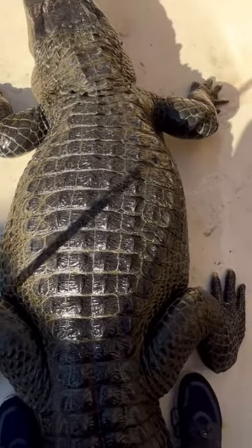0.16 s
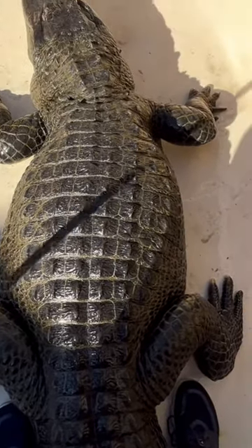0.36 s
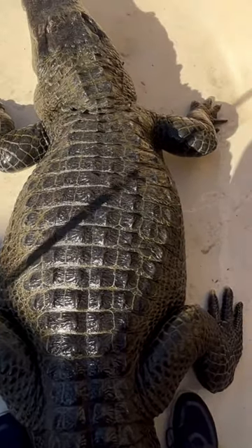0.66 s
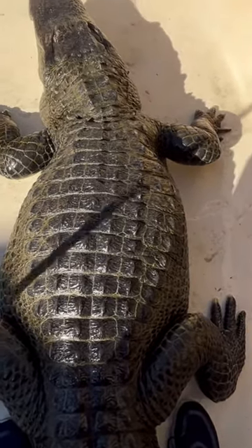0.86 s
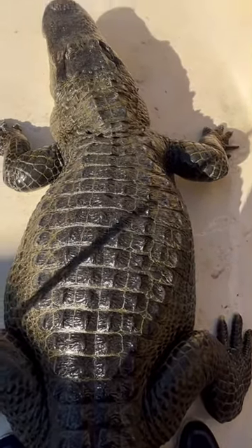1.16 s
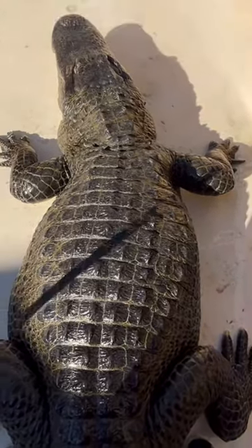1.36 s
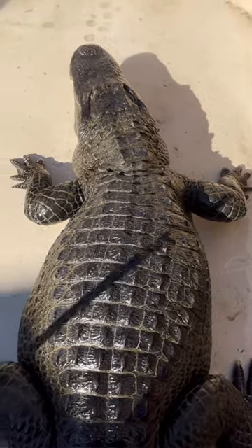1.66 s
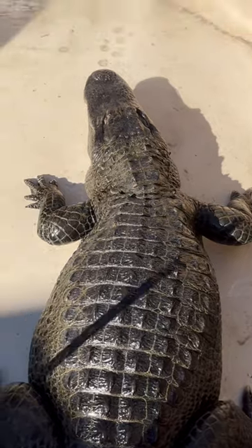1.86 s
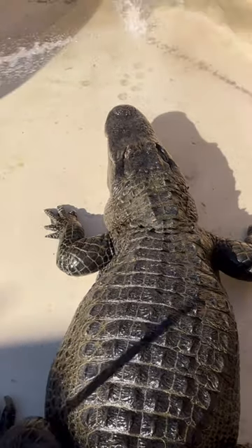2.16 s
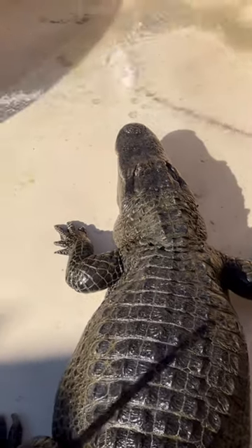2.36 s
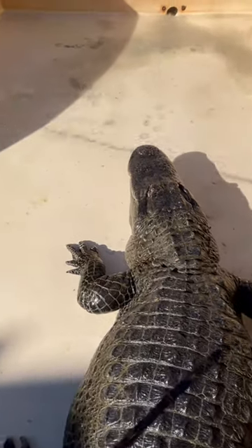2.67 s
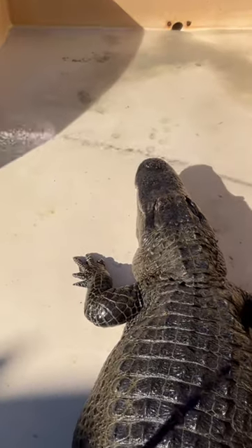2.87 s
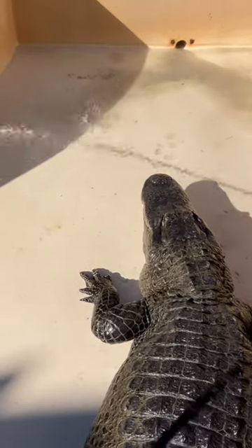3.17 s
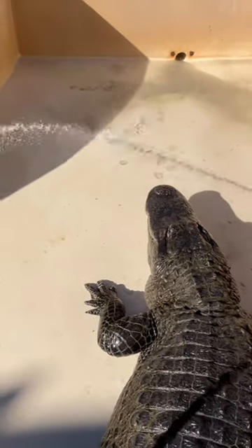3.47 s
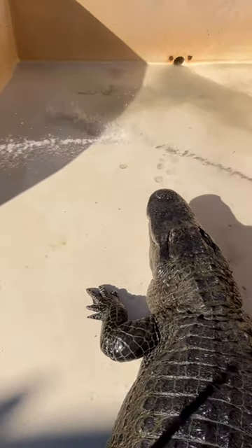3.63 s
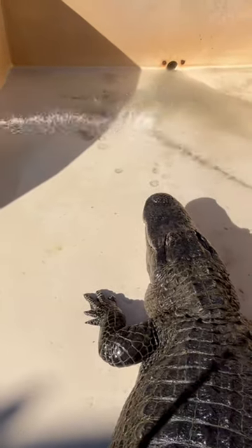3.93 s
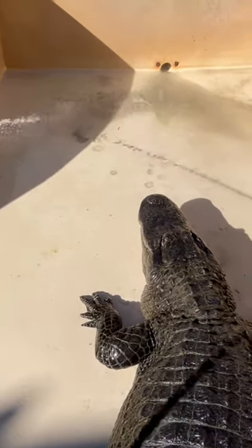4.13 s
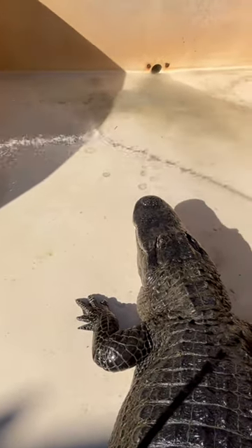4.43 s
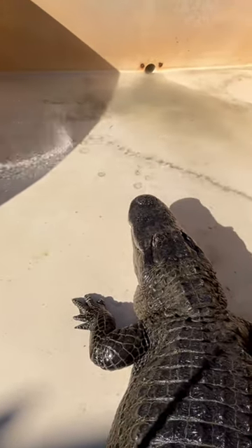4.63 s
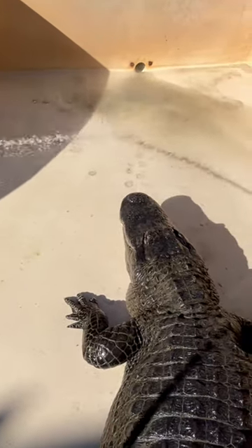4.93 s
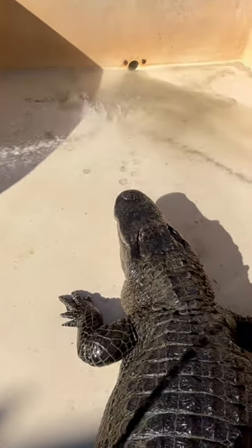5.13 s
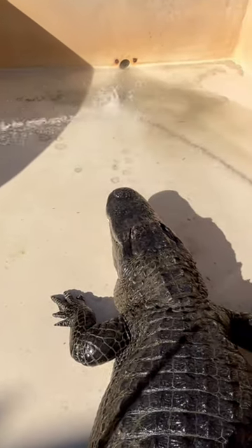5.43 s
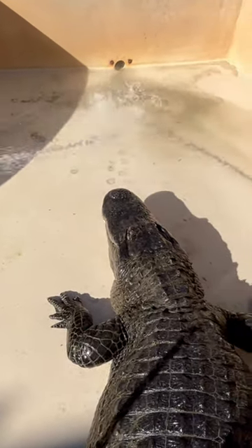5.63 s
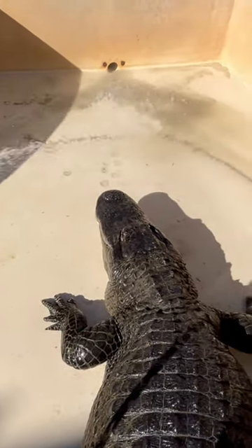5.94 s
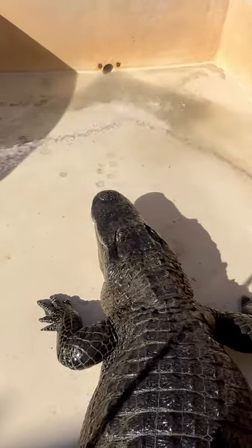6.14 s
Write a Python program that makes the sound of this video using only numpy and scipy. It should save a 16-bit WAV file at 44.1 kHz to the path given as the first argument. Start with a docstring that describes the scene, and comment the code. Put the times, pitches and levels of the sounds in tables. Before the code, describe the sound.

A garden hose sprays water in a hard-walled outdoor pen, heard from close by. It opens with a sharp sizzle, then hisses and splatters in uneven gushes on an alligator's back, with soft, dull drumming. After about two seconds the jet swings onto the wet floor, where the hiss tightens and softens a little. Splashes, gurgles and small bubble plops continue to the end over a faint low rumble.

```python
"""In a hard-walled pen, a garden hose sprays an alligator's back, then swings onto the wet floor.
Countless drop impacts sum to a hiss under a fine mist. The jet breaks into gushes that splash in the
water film and trap air, which resonates as bubbles and gurgles where the water pools. The water's weight
drums softly on the body. Echoes from floor and walls interfere with the spray's sound and shift its
colour, all over a low outdoor rumble."""
import sys
import numpy as np
from scipy import signal
from scipy.fft import rfft, irfft
from scipy.io import wavfile
from scipy.ndimage import map_coordinates

SR = 44100
rng = np.random.default_rng(int(sys.argv[2]) if len(sys.argv) > 2 else 0)


def store_wav(level_fs):
    """Save 16-bit WAV to argv[1]."""
    pcm = np.round(np.clip(np.atleast_2d(level_fs), -1, 1) * 32767)
    wavfile.write(sys.argv[1], SR, pcm.T.astype(np.int16))


N = 277830
TIME, FREQS = np.arange(N) / SR, np.maximum(np.arange(N // 2 + 1) * SR / N, 1)

# Envelopes of the continuous sources, before their gains: time_s, level_db
RUMBLE_LEVEL = [(0, -52.5), (1.2, -51), (2.3, -50.5), (2.7, -54), (3.3, -54.5), (4.2, -54), (5, -52.5),
                (6.3, -52)]
MIST_LEVEL = [(0, -33.5), (.2, -31.5), (.45, -36.5), (1.6, -37.5), (2.2, -36), (2.6, -38), (4.7, -38.5),
              (5.6, -37.5), (6.3, -38.5)]
STEADY_SPLASH_LEVEL = [(0, -37.5), (.45, -41), (.66, -41.5), (.9, -37.5), (1.43, -39), (1.67, -37),
                       (1.96, -39), (2.03, -42), (2.12, -39.5), (2.4, -40.5), (2.6, -43.5), (2.68, -47),
                       (3.3, -46.5), (3.65, -40.5), (4.3, -42), (4.5, -45), (4.75, -46), (4.93, -44.5),
                       (4.97, -39), (5.5, -38.5), (5.9, -43), (6.3, -43)]
JET_LEVEL = [(0, -31), (.27, -33), (.4, -31), (1.0, -31), (1.65, -31.5), (1.85, -30), (2.15, -30.5),
             (2.6, -34), (2.68, -34.5), (2.76, -33), (3.3, -33.5), (3.48, -31.5), (3.57, -31),
             (3.85, -31.5), (3.94, -34.5), (4.05, -34), (4.35, -32.5), (4.78, -34), (5.1, -31.5),
             (5.5, -32), (6.1, -33.5), (6.3, -33.5)]
# Share of the jet that lands on the floor, and how tightly it holds together there: time_s, share
FLOOR_SHARE = [(0, 0.4), (.45, 0.23), (1.55, 0.07), (1.9, 0.83), (2.5, 0.99), (6.3, 0.91)]
JET_FOCUS = [(0, 0), (2.3, 0.12), (2.6, 1), (3.3, 0.74), (3.5, .25), (3.95, 0.6), (4.5, 0.5), (4.7, 0.7),
             (4.9, .9), (5.02, 0.13), (5.6, 0.16), (6.3, .35)]
# Sway of the landing point: time_s, left_minus_right_db
LANDING_SWAY = [(0, 1), (.7, 1.3), (2.2, 1.5), (2.7, 3), (3.7, 2), (5.7, 1.9), (6.3, 1)]
# Hollow resonance of the hiss, gliding as the jet swings: time_s, centre_hz, lift_db
LEFT_RESONANCE = [(0, 6600, 6), (.25, 6750, 4.5), (.5, 6440, 4), (1.2, 5900, 3.5), (1.6, 5600, 3),
                  (2.05, 5050, 4.5), (2.6, 5950, 1.5), (2.9, 6100, 0.5), (4.8, 6000, 2), (5.4, 5380, 4.5),
                  (6.3, 5230, 2.5)]
RIGHT_RESONANCE = [(0, 6750, 2), (.25, 6900, 2.5), (.45, 6960, 3.6), (1.6, 7500, 3.1), (1.9, 6850, 3.9),
                   (2.25, 6860, 4.2), (2.5, 6500, 1.2), (3.7, 6500, 1.3), (5.2, 6300, 1.5),
                   (5.7, 6270, 4.8), (6.3, 5950, 5.9)]
# Bands that reflections cancel or reinforce on the right: time_s, centre_hz, lift_db, bend_rad
UPPER_INTERFERENCE = [(0, 5830, 4, 1.5), (.28, 6130, 6, 1.5), (.45, 6200, -10, 0.94), (.8, 6400, -8, 1.3),
                      (1.2, 6440, 2, 1), (1.55, 6900, -3, 1), (1.85, 6250, -5, 1.7), (2.15, 5650, 5, 0.81),
                      (2.5, 5370, -1, 0.13), (5.4, 5400, -1, 0.26), (5.7, 5800, 2, 0.93),
                      (6.3, 6000, -1, 1.3)]
LOWER_INTERFERENCE = [(0, 3550, 3, 0), (.3, 3520, 2, 0), (.7, 3300, -2.5, 0), (1.2, 3270, 2.5, 0),
                      (1.8, 3340, 0, 0), (3.7, 3330, 0.5, 0), (5.5, 3320, 0.5, 0), (6, 3220, -2, 0)]

# Spectral shapes of the sources: frequency_hz, relative_level_db
RUMBLE_SPECTRUM = [(15, -60), (30, -42), (42, -19), (55, -2.5), (74, 0), (95, -6.5), (118, -2.5),
                   (145, -16), (300, -48)]
PATTER_SPECTRUM = [(30, -45), (80, -23), (150, -3.5), (220, -1), (330, 6), (520, 1.5), (700, -12),
                   (1200, -38)]
THUD_SPECTRUM = [(30, -45), (70, -26), (130, -11), (200, 0), (270, -5), (430, -14), (600, -3.5), (900, -17),
                 (3000, -40)]
GURGLE_SPECTRUM = [(60, -30), (400, -10), (600, -4.5), (760, 2), (1150, 7.5), (1450, 0), (1700, 2),
                   (2050, 3.5), (3000, -44)]
MIST_SPECTRUM = [(7000, -28), (9500, -7), (10400, 1), (11500, 0), (13000, -1.5), (14200, -4), (15600, -2.5)]
SIZZLE_SPECTRUM = [(3000, -35), (6100, -16), (6550, -2), (6750, 3), (7050, -0.5), (7350, -4), (8100, -8),
                   (8700, -29), (9300, -8), (9700, 0), (10200, -9), (10800, -37)]
HIDE_SPLASH_SPECTRUM = [(1100, -28), (1600, -10), (2000, 0.5), (2400, -2), (2900, 2.5), (3700, 5),
                        (5200, -2.5), (8000, -11.5)]
FLOOR_SPLASH_SPECTRUM = [(1100, -29), (1600, -7), (2000, -4.5), (2400, -3.5), (2800, -3), (3300, 1),
                         (4000, 1.5), (5200, -3.5), (8000, -57)]
HIDE_HISS_SPECTRUM = [(1500, -11.5), (3000, -6), (3900, -8.5), (4600, 1.5), (5150, 3.5), (5700, 0),
                      (6300, -1.5), (7200, -1), (8600, -4.5), (9700, -1), (10200, -28), (10800, -35)]
FLOOR_HISS_SPECTRUM = [(1500, -31), (2600, -3.5), (3300, -7), (4600, 2.5), (5200, 4), (5700, 5.5),
                       (6400, 3), (7300, 4.5), (8200, -2), (8900, -0.5), (9700, 1.5), (10200, -4.5),
                       (10800, -35)]
TIGHT_HISS_SPECTRUM = [(1500, -25), (2700, -9), (3300, -8), (4000, -4.5), (4600, 1.5), (5000, 2.5),
                       (5400, 5), (5900, 8), (6400, 9), (7000, 3), (7400, 2), (8200, 0), (8900, 1),
                       (9700, 3), (10200, 1), (10800, -35)]
# Level differences between the ears: frequency_hz, left_minus_right_db
HIDE_BALANCE = [(60, -7), (200, -1.5), (480, -1), (1000, -4.5), (1500, -2.5), (2700, -3), (4500, -4.5),
                (5500, -6), (6200, 3), (7000, 0), (8000, -9.5), (9600, -6), (10400, 0.5)]
FLOOR_BALANCE = [(60, -1.5), (250, -2.5), (480, -8), (1100, 1), (1600, -3.5), (3200, -6), (5300, -3.5),
                 (6400, -5.5), (7100, -7.5), (8600, -1.5), (9600, -9), (10400, -1.5)]
SIZZLE_BALANCE = [(6300, 7), (6900, -4.5), (8000, 1), (8700, 0), (9700, -1), (10400, -2)]
# Extra phase lead of the left ear for spray on the floor: frequency_hz, lead_rad
FLOOR_PHASE = [(500, 0), (1800, -1.1), (2500, -3.6), (3000, -4.7), (3500, -5.7), (4500, -5.9), (5500, -5.9),
               (7000, -6.7), (8200, -6.9), (8700, -9.4), (9300, -12.3), (10200, -12.9)]
# Share of the sound common to both ears, in general and for a tight jet: frequency_hz, share
# The high treble is heard centred, and the very top in antiphase.
COMMON_SHARE = [(60, 0.82), (330, 0.81), (520, 0.07), (750, 0.74), (1500, 0.51), (2100, 0.1), (3100, 0.5),
                (4000, 0.52), (5000, 0.3), (5800, 0.3), (6600, 0.64), (7400, 0.5), (8700, 0.3), (9700, 0.4),
                (10200, 0.3), (10500, 1), (13000, 1), (13700, 0.4), (14500, 1)]
TIGHT_COMMON_SHARE = [(3800, 0.5), (4500, 1), (5000, 0.3), (5500, 0.8), (6500, 0.84), (7500, .72),
                      (8700, 0.34), (9700, 0.3), (10500, 1)]

# Puffs of fine spray: peak_s, length_s, level_db
MIST_PUFFS = [(.283, 0.028, -37.5), (.62, 0.077, -42), (.76, .05, -47), (.91, 0.03, -40), (1.1, .04, -47),
              (1.32, 0.035, -37), (2.4, 0.039, -45), (2.735, 0.04, -38), (3.45, 0.044, -44),
              (3.61, 0.066, -45), (4.385, .035, -46), (5.58, 0.044, -43), (6.15, 0.046, -44)]
# Single ringing blips, mostly bubbles in the puddle, and the knock of the water slap at about 5.37 s: start_s,
# pitch_hz, level_db
SINGLE_RINGS = [(2.078, 934, -40), (2.81, 343, -42), (2.87, 308, -44), (2.91, 572, -48), (3.0, 333, -38),
                (3.38, 590, -45), (4.32, 514, -41), (4.355, 590, -47), (5.022, 2000, -35),
                (5.102, 1890, -32), (5.353, 1790, -30), (5.37, 786, -36), (5.371, 1090, -30),
                (5.387, 1850, -31)]
# Heavy slaps of water: start_s, level_db
WATER_SLAPS = [(.74, -42), (1.53, -39), (2.08, -37), (3.541, -41), (3.83, -40), (5.365, -36), (5.388, -42),
               (5.601, -36.5)]
# Resonances of the air that the slaps trap: pitch_hz, width_hz, level_db
AIR_POCKETS = [(755, 200, 0), (1116, 490, 5.5), (1650, 480, 3.5)]
# Gushes, ringing lower on the back than on the floor: peak_s, length_s, level_db, pitch_hz
JET_GUSHES = [(0.01, .03, -35, 2900), (0.13, 0.041, -39.5, 2900), (0.293, 0.042, -33.5, 2450),
              (0.34, 0.034, -45, 2750), (0.556, 0.044, -33.5, 2500), (0.733, 0.031, -33.5, 2380),
              (0.777, .035, -35.5, 2250), (0.904, 0.042, -37, 2600), (0.973, 0.05, -35, 2280),
              (1.013, 0.021, -42, 2410), (1.116, 0.024, -35, 2470), (1.33, 0.042, -34, 2280),
              (1.525, .03, -34.5, 2400), (1.57, 0.039, -34.5, 2440), (1.677, 0.055, -44, 2400),
              (1.759, 0.027, -35.5, 2430), (1.822, 0.089, -39, 2600), (1.915, 0.076, -37, 2720),
              (2.111, 0.059, -33.5, 3100), (2.235, .04, -40, 3030), (2.322, 0.053, -35.5, 2960),
              (2.544, 0.15, -38.5, 3120), (2.73, 0.038, -38.5, 3720), (2.854, 0.061, -41, 3700),
              (2.975, 0.071, -41, 3700), (3.098, 0.055, -41.5, 3500), (3.369, 0.041, -39.5, 3420),
              (3.456, 0.038, -41, 3370), (3.545, 0.046, -35, 3000), (3.74, 0.02, -42, 3340),
              (3.832, 0.066, -37.5, 2590), (4.101, .1, -37.5, 3120), (4.315, 0.061, -45, 3440),
              (4.605, 0.075, -40.5, 3660), (4.96, .025, -38.5, 3300), (5.033, 0.03, -42, 2170),
              (5.107, 0.039, -41, 2120), (5.223, 0.014, -38.5, 2800), (5.388, 0.05, -38.5, 2870),
              (5.463, .03, -45, 3300), (5.546, .025, -40.5, 2570), (5.616, 0.045, -39, 3000),
              (5.726, 0.04, -37.5, 2960), (5.999, 0.037, -41, 3220)]

LEFT_LEAD_S, LEAD_LOW_HZ, LEAD_HIGH_HZ = 0.000431, 450, 10200   # the left ear leads within this band
ANTIPHASE_ABOVE_HZ = 13900
WALL_DELAY_S, WALL_WOBBLE_S, WALL_ECHO_DB = .00094, .000014, -16
DRUM_DB, DRUM_START_DB, DRUM_SETTLE_S = -49, 4.5, 1   # the drumming starts louder and settles
GURGLE_DB, SIZZLE_DB, SIZZLE_FADE_S = -43, -29.5, 0.38
DRUM_FOLLOWS, GURGLE_FOLLOWS, RING_FOLLOWS = 0.12, 0.65, 0.11   # dB for each dB of surge in the splashing
MIST_GAIN_DB, PUFF_GAIN_DB = 4, 9
SPLAT_GAIN_DB, SPLAT_SPREAD_DB = 4.5, 4
GUSH_GAIN_DB, STEADY_SPLASH_GAIN_DB, GUSH_RAGGED_DB = 4, 5.5, 1.6
HIDE_RING_DB, FLOOR_RING_DB, RING_WANDER_HZ, RING_FLICKER_DB = 3, 4, 90, 0.5   # resonance of the splashes
TIGHT_RING_HZ, TIGHT_RING_DB, TIGHT_WANDER_HZ, TIGHT_FLICKER_DB = 4800, 1.5, 160, 1.8
JET_GAIN_DB, GUSH_HISS_GAIN_DB = 2, -4.5


def from_db(db):
    """Amplitude grows tenfold for every 20 decibels."""
    return 10 ** (np.asarray(db) / 20)


def unit_power(x):
    """Division by the root mean square gives unit power."""
    return x / np.sqrt(np.mean(x ** 2) + 1e-20)


def in_time(rows):
    """Linear interpolation gives each column of a table at every sample."""
    time_s, *columns = np.transpose(rows)
    return [np.interp(TIME, time_s, column) for column in columns]


def at_hz(points):
    """Interpolation on a logarithmic axis gives a table's value at every frequency."""
    hz, value = np.transpose(points)
    return np.interp(np.log(FREQS), np.log(np.maximum(hz, 1)), value)


def drift(rate_hz):
    """Low-pass filtered noise fluctuates smoothly, with unit power."""
    return unit_power(irfft(rfft(rng.standard_normal(N)) / (1 + (FREQS / rate_hz) ** 2), N))


def drops(per_s, spread_db):
    """Shot noise: independent impacts at random moments, many small and a few large."""
    sizes = from_db(spread_db * np.minimum(rng.exponential(1, N), 6))
    return unit_power(sizes * rng.choice([-1, 1], N) * (rng.random(N) < per_s / SR))


def bubble(hz, cycles, rise):
    """A bubble is a damped oscillator whose pitch rises as it nears the surface."""
    t = np.arange(SR // 16) / SR
    age = t * hz / cycles
    return np.exp(-age) * np.sin(2 * np.pi * hz * t * (1 + rise * age))


def swells(rows, rise_share):
    """Incoherent sources add in power: each lump of water swells and ebbs in a bell curve."""
    power = np.zeros(N)
    for peak_s, length_s, db, *_ in rows:
        width_s = length_s * np.where(TIME < peak_s, rise_share, 1 - rise_share)
        power += from_db(db) ** 2 * .5 ** np.minimum(((TIME - peak_s) / width_s) ** 2, 60)
    return np.sqrt(power)


def aimed(hide, floor):
    """An equal-power crossfade shares the water between hide and floor as the jet swings."""
    on_floor = np.clip(in_time(FLOOR_SHARE)[0], 0, 1)
    return np.sqrt(1 - on_floor) * hide + np.sqrt(on_floor) * floor


def resonance(x, controls, width_hz):
    """A gliding resonance or notch scales one band; controls are centre, lift and optional phase bend."""
    hz, frame_s, frames = signal.stft(x, SR, nperseg=512)
    centre_hz, lift_db, *bend_rad = [np.interp(frame_s, TIME, control) for control in controls]
    detuning = (hz[:, None] - centre_hz) / width_hz
    gain = from_db(lift_db * np.exp(-detuning ** 2))
    if bend_rad:
        gain = gain * np.exp(-2j * bend_rad[0] * detuning / (1 + np.abs(detuning) ** 1.6))
    return signal.istft(frames * gain, SR)[1][..., :N]


def in_pen(impacts, spectrum, balance, extra_phase=((20, 0), (20000, 0)), common_share=COMMON_SHARE):
    """Partial coherence: impacts common to both ears mix with a diffuse wash that differs in each."""
    share = np.clip(at_hz(common_share), 0, 1)
    lead_s = LEFT_LEAD_S * (FREQS > LEAD_LOW_HZ) * (FREQS < LEAD_HIGH_HZ)
    phase = 2 * np.pi * FREQS * lead_s + at_hz(extra_phase) + np.pi * (FREQS > ANTIPHASE_ABOVE_HZ)
    ears = np.array([[.5], [-.5]])   # each ear takes half of a difference
    common = np.exp(1j * phase * ears) * rfft(impacts)
    diffuse = rfft(rng.standard_normal((2, N)))
    field = np.sqrt(share) * common + np.sqrt(1 - share) * diffuse
    return unit_power(irfft(field * from_db(at_hz(spectrum) + at_hz(balance) * ears), N))


def wall_echo(x):
    """Comb filtering: the left wall's echo makes peaks that shift as the landing point wobbles."""
    delay_s = WALL_DELAY_S + WALL_WOBBLE_S * drift(rate_hz=4.4)
    left, right = x
    echo = map_coordinates(left, [np.arange(N) - SR * delay_s], order=3)
    return unit_power(np.array([left + from_db(WALL_ECHO_DB) * echo, right]))


def near_echoes(x, echo_db, wander_s, count):
    """Early reflections from floor and walls interfere; their paths wander, so the colour shifts."""
    out = x.copy()
    for k, delay_s in enumerate(np.geomspace(.0013, .009, count)):
        read_at = np.arange(N) - SR * (delay_s + wander_s * drift(rate_hz=1.43))
        echo = np.array([map_coordinates(channel, [read_at], order=3) for channel in x])
        out += (-1) ** k * from_db(echo_db) * echo
    return out / np.sqrt(1 + count * from_db(echo_db) ** 2)


def rumble():
    """The outdoor background is random noise with its power at low frequencies."""
    noise = in_pen(rng.standard_normal(N), RUMBLE_SPECTRUM, FLOOR_BALANCE)
    return from_db(in_time(RUMBLE_LEVEL)[0]) * noise


def drumming(surge_db):
    """Impact forces patter dully on body and floor, with a deeper thud on the body."""
    patter = in_pen(drops(per_s=1800, spread_db=3.5), PATTER_SPECTRUM, FLOOR_BALANCE)
    thud = in_pen(drops(per_s=1100, spread_db=2.5), THUD_SPECTRUM, HIDE_BALANCE)
    opening_db = DRUM_START_DB * np.exp(-(TIME / DRUM_SETTLE_S) ** 2)
    level_db = DRUM_DB + DRUM_FOLLOWS * surge_db + opening_db + .6 * drift(rate_hz=11)
    return from_db(level_db) * aimed(from_db(-5.5) * patter + from_db(-8.0) * thud, patter)


def bubble_cloud(per_s, cycles, rise):
    """Size sets a bubble's resonance: mixed sizes, born at random, ring at mixed pitches."""
    out = np.zeros(N + SR)
    for when, smallness, weakness in rng.random((int(per_s * N / SR), 3)):
        ring, at = bubble(600 * 3 ** smallness, cycles, rise), int(when * N)
        out[at:at + len(ring)] += from_db(-14 * weakness) * ring
    return unit_power(out[:N])


def gurgle(surge_db):
    """Air stirred into the puddle by the splashing resonates and bursts."""
    ringing = bubble_cloud(per_s=640, cycles=9.3, rise=0.0264)
    bursts = drops(per_s=1500, spread_db=6.5)
    level_db = GURGLE_DB + GURGLE_FOLLOWS * surge_db + drift(rate_hz=24)
    return from_db(level_db) * in_pen(0.23 * ringing + 0.16 * bursts, GURGLE_SPECTRUM, FLOOR_BALANCE)


def plops(cycles):
    """Damped oscillators ring one at a time: bubbles in the puddle, the large ones at low pitch, and the knock
    of a landing slap."""
    out = np.zeros(N + SR)
    for start_s, hz, db in SINGLE_RINGS:
        ring, at = bubble(hz, cycles, rise=0.033), int(start_s * SR)
        out[at:at + len(ring)] += from_db(db) * ring * signal.windows.tukey(len(ring), .2)
    return out[:N]


def slaps(decay_s):
    """A landing lump of water briefly excites the resonances of trapped air."""
    envelope = sum(from_db(db) * (TIME > start_s) * np.exp(-np.abs(TIME - start_s) / decay_s)
                   for start_s, db in WATER_SLAPS)
    response = sum(from_db(db) / (1 + 1j * (FREQS ** 2 - hz ** 2) / (FREQS * width_hz)) ** 2
                   for hz, width_hz, db in AIR_POCKETS)
    response /= np.sqrt(np.mean(np.abs(response) ** 2))
    return irfft(rfft(envelope * rng.standard_normal((2, N))) * response, N)


def splats(cycles, spread_octaves, pan_db, count):
    """Air entrainment: each gush traps small bubbles around its own pitch, which make it sound wet."""
    out = np.zeros((2, N + SR))
    clusters = rng.uniform(-1, 1, (len(JET_GUSHES), count, 4))
    for (peak_s, length_s, db, hz), cluster in zip(JET_GUSHES, clusters):
        for when, detuning, strength, place in cluster:
            gain = from_db(db + SPLAT_GAIN_DB + SPLAT_SPREAD_DB * strength)
            ring = gain * bubble(hz * 2 ** (spread_octaves * detuning), cycles, rise=0.027)
            left_at = int(max(peak_s + when * length_s / 2, 0) * SR)
            right_at = left_at + int(LEFT_LEAD_S * SR)
            out[0, left_at:left_at + len(ring)] += from_db(pan_db + SPLAT_SPREAD_DB * place) * ring
            out[1, right_at:right_at + len(ring)] += ring
    return out[:, :N]


def mist(sputter):
    """The finest droplets make shot noise in the top treble, steadily and in puffs."""
    droplets = in_pen(drops(per_s=15000, spread_db=3.0), MIST_SPECTRUM, FLOOR_BALANCE)
    steady = from_db(in_time(MIST_LEVEL)[0] + MIST_GAIN_DB)
    puffs = from_db(PUFF_GAIN_DB) * swells(MIST_PUFFS, rise_share=0.56)
    return np.hypot(steady, puffs) * from_db(0.9 * sputter) * droplets


def sizzle(sputter):
    """Narrow spectral peaks give the opening spray a sharp ring, which holds and then dies away."""
    impacts = drops(per_s=14000, spread_db=3.5)
    ring = in_pen(impacts, SIZZLE_SPECTRUM, SIZZLE_BALANCE, FLOOR_PHASE, TIGHT_COMMON_SHARE)
    return from_db(SIZZLE_DB + 0.87 * sputter) * np.exp(-(TIME / SIZZLE_FADE_S) ** 6) * ring


def splash(level_db, surge_db, sputter):
    """Gushes strike the water film, and each excites a resonance at its own pitch."""
    hide = in_pen(drops(per_s=3000, spread_db=2.0), HIDE_SPLASH_SPECTRUM, HIDE_BALANCE)
    floor = in_pen(drops(per_s=3000, spread_db=2.5), FLOOR_SPLASH_SPECTRUM, FLOOR_BALANCE, FLOOR_PHASE)
    centre_hz = in_time(JET_GUSHES)[-1] + RING_WANDER_HZ * drift(rate_hz=3.9)
    lift_db = np.interp(in_time(FLOOR_SHARE)[0], [0, 1], [HIDE_RING_DB, FLOOR_RING_DB])
    lift_db += RING_FLICKER_DB * drift(rate_hz=7.5) + RING_FOLLOWS * surge_db
    ringing = resonance(aimed(hide, floor), (centre_hz, lift_db), width_hz=140)
    return from_db(level_db + 0.44 * sputter + 1.1 * drift(rate_hz=29)) * ringing


def tight_jet():
    """A tight jet is a compact source; its resonance wanders as the hand trembles."""
    impacts = drops(per_s=14000, spread_db=2.5)
    spot = in_pen(impacts, TIGHT_HISS_SPECTRUM, FLOOR_BALANCE, FLOOR_PHASE, TIGHT_COMMON_SHARE)
    centre_hz = TIGHT_RING_HZ + TIGHT_WANDER_HZ * drift(rate_hz=3)
    lift_db = TIGHT_RING_DB + TIGHT_FLICKER_DB * drift(rate_hz=7.1)
    return resonance(spot, (centre_hz, lift_db), width_hz=420)


def hiss(gushes, sputter):
    """Dense impacts on hide and floor superpose into broadband noise, louder in a gush."""
    hide = in_pen(drops(per_s=15000, spread_db=4.0), HIDE_HISS_SPECTRUM, HIDE_BALANCE)
    loose = in_pen(drops(per_s=14000, spread_db=3.5), FLOOR_HISS_SPECTRUM, FLOOR_BALANCE, FLOOR_PHASE)
    focus = np.clip(in_time(JET_FOCUS)[0], 0, 1)
    floor = wall_echo(np.sqrt(1 - focus) * loose + np.sqrt(focus) * tight_jet())
    left, right = aimed(hide, floor)
    left = resonance(left, in_time(LEFT_RESONANCE), width_hz=1300)
    right = resonance(right, in_time(UPPER_INTERFERENCE), width_hz=180)
    right = resonance(right, in_time(RIGHT_RESONANCE), width_hz=1540)
    level = np.hypot(from_db(in_time(JET_LEVEL)[0] + JET_GAIN_DB), from_db(GUSH_HISS_GAIN_DB) * gushes)
    return level * from_db(0.92 * sputter) * np.array([left, right])


def scene():
    """Common modulation binds the layers: gushes splash, stir and drum; bright sounds sputter as one."""
    gushes = swells(JET_GUSHES, rise_share=0.5)
    gushes *= from_db(GUSH_RAGGED_DB * drift(rate_hz=70))   # each breaks into smaller lumps
    sputter = drift(rate_hz=13.0)
    steady = from_db(in_time(STEADY_SPLASH_LEVEL)[0] + STEADY_SPLASH_GAIN_DB)
    splash_db = 20 * np.log10(np.hypot(steady, from_db(GUSH_GAIN_DB) * gushes))
    surge_db = splash_db - splash_db.mean()
    water = hiss(gushes, sputter) + sizzle(sputter) + mist(sputter)
    water += splash(splash_db, surge_db, sputter)
    water += gurgle(surge_db) + slaps(decay_s=0.038) + plops(cycles=14.3) + drumming(surge_db)
    water += splats(cycles=8.0, spread_octaves=0.28, pan_db=-8.5, count=14)
    water[1] = resonance(water[1], in_time(LOWER_INTERFERENCE), width_hz=125)
    water = near_echoes(water, echo_db=-17.5, wander_s=.00012, count=4)
    sway = from_db(in_time(LANDING_SWAY)[0] * [[.5], [-.5]])
    return rumble() + sway * water


def record(dry, cutoff_hz=15600):
    """An elliptic low-pass filter cuts the highest treble steeply."""
    return signal.sosfilt(signal.ellip(10, .2, 80, cutoff_hz, fs=SR, output="sos"), dry)


dry = scene()
out = record(dry)
store_wav(out)
```